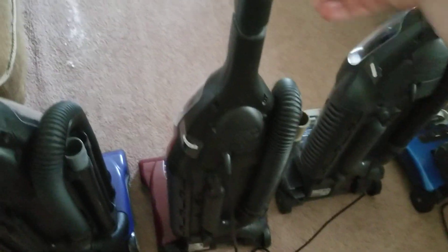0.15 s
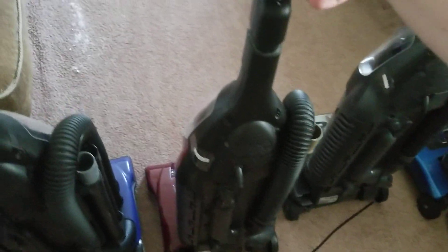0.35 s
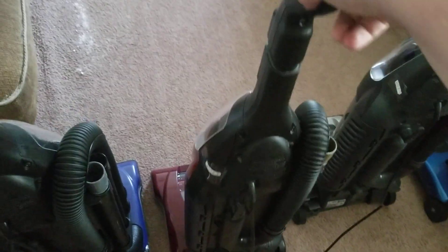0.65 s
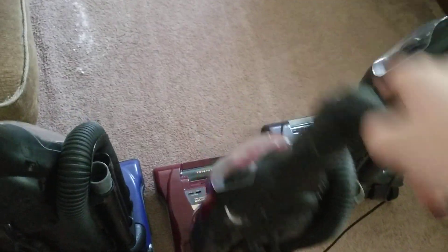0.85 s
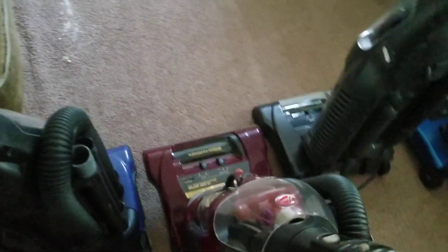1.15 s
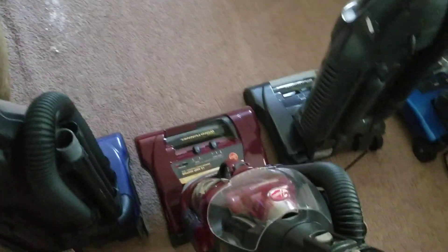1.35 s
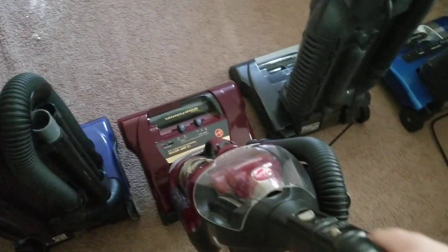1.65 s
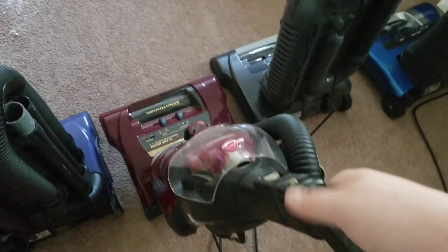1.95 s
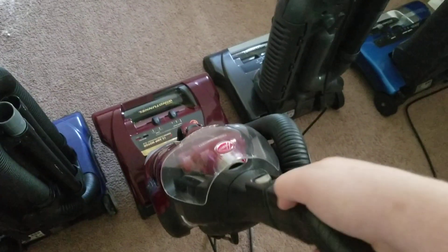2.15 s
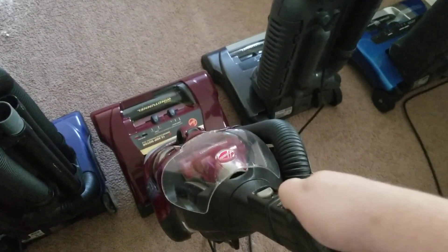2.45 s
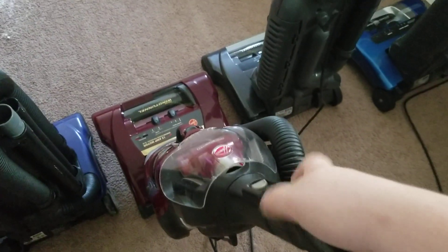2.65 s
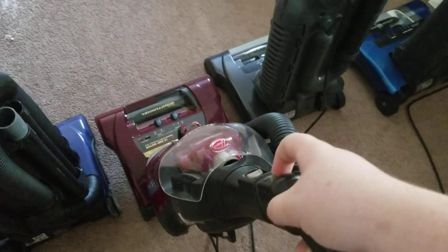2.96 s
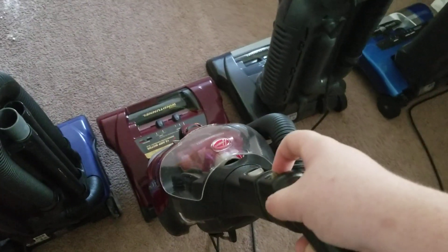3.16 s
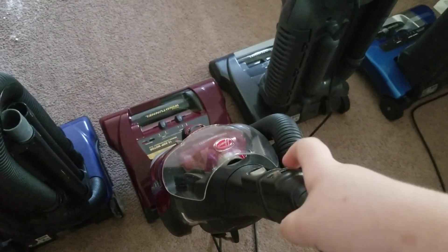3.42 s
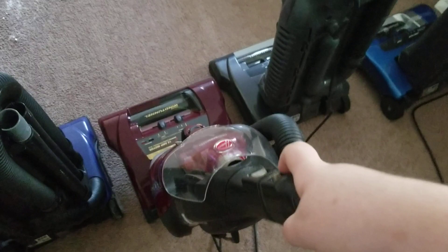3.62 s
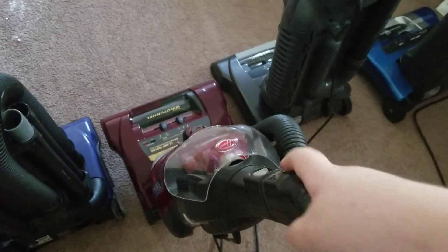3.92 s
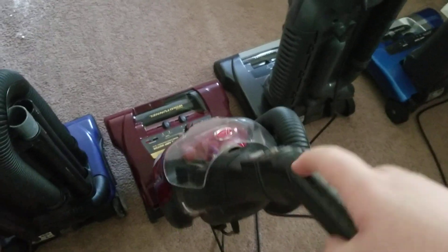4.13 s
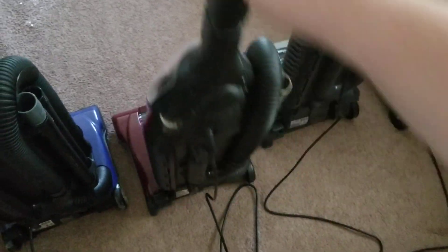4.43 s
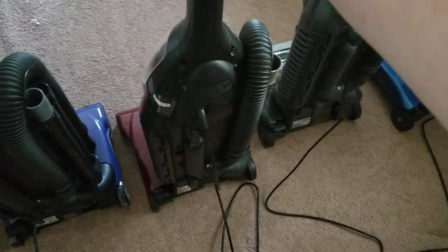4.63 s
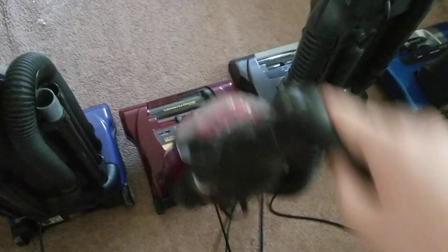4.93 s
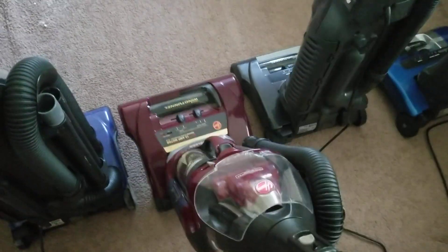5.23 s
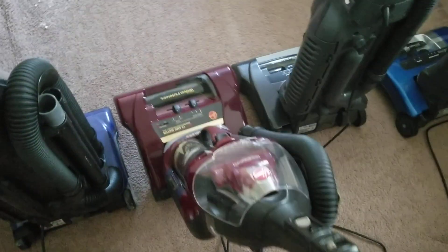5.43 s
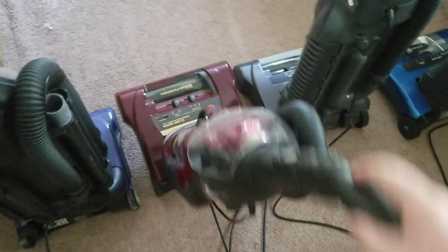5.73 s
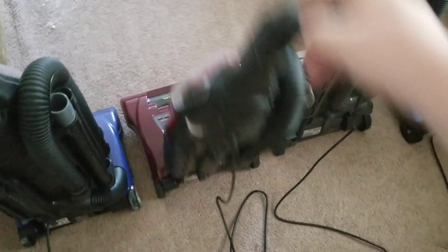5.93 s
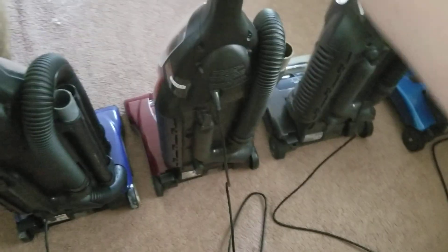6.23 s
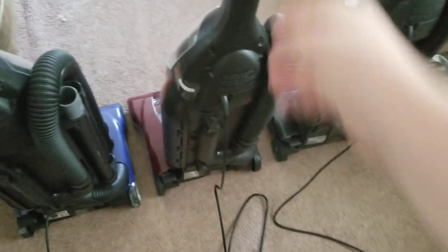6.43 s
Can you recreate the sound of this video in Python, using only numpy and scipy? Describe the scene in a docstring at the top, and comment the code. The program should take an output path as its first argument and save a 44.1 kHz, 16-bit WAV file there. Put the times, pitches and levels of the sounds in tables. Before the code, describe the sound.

Close stereo pickup of a vacuum cleaner being handled on carpet. A rushing motor noise fades smoothly to rest under plastic clacks, rattles and grainy rubbing. After a quieter moment, a springy switch clicks sharply with no motor response. Then come a busy burst of hollow knocks and scrapes, gliding thin squeaks from the pivot, a few tiny ticks, and a second squeaky swing. A faint low rumble and short room reflections remain throughout.

```python
"""Upright vacuum cleaners in a carpeted room, heard from close by, over a low room rumble.
First a motor coasts to rest, its hum and whine fading, while one cleaner is rolled forward and tilted back.
Its plastic shell knocks and scrapes: short noise bursts and pushed, grainy noise ring its resonances.
The pivot squeaks thinly (a gliding tone with its octave); then the switch snaps, but no motor starts.
The handle is then swung up and down twice, with more knocks, scrapes and squeaks, and a few thin ticks."""
import sys
import numpy as np
from scipy import signal
from scipy.fft import rfft, irfft
from scipy.io import wavfile
from scipy.ndimage import uniform_filter1d

SR = 44100
rng = np.random.default_rng(int(sys.argv[2]) if len(sys.argv) > 2 else 0)


def wav_out(sig):
    """Save sig, one row per channel (or a flat mono array), as 16-bit PCM at SR to the path in sys.argv[1]."""
    wavfile.write(sys.argv[1], SR, np.round(np.clip(np.atleast_2d(sig).T, -1, 1) * 32767).astype(np.int16))


N = 290177
TIME = np.arange(N) / SR  # s


def undb(db):
    """Turn decibels into a gain."""
    return 10 ** (np.asarray(db) / 20)


def unit(x):
    """Scale to an average (rms) level of 1."""
    return x / np.sqrt(np.mean(x ** 2))


def curve(rows, axis=1):
    """Read one column of a time table at every sample."""
    rows = np.array(rows)
    return np.interp(TIME, rows[:, 0], rows[:, axis])


def across(points, hz):
    """Read (frequency, value) points on a log-frequency axis."""
    f, value = np.transpose(points)
    return np.interp(np.log(hz + 1e-9), np.log(f), value)


def noise(colour, size=N):
    """Stereo noise of a given colour, alike in the bass and nearly unrelated in the treble."""
    # likeness of the two channels: (frequency [Hz], correlation [-1 to 1])
    likeness = [(60, 0.95), (350, 0.91), (700, 0.62), (1400, 0.28), (3000, 0.2), (5000, -0.055),
                (15000, 0.023)]
    hz = np.fft.rfftfreq(size, 1 / SR)
    if size < N:
        # short bursts: even strength at all frequencies, random phases
        mid, side = np.exp(2j * np.pi * rng.random((2, len(hz))))
    else:
        mid, side = rfft(rng.standard_normal((2, size)))
    like = np.clip(across(likeness, hz), -.99, .99)
    mid = mid * np.sqrt(1 + like)
    side = side * np.sqrt(1 - like)
    left_right = np.array([mid + side, mid - side])
    return unit(irfft(left_right * undb(across(colour, hz)), size))


def walk(rate):
    """A smooth random wander: levels held for 1 / rate seconds, then smoothed twice; spread near 1."""
    hold = int(SR / rate)
    steps = np.repeat(rng.standard_normal(N // hold + 1), hold)
    smooth = uniform_filter1d(uniform_filter1d(steps, hold), hold)
    return unit(smooth[:N])


def tone(hz, width_hz):
    """A narrow line whose strength and phase wander."""
    wander = walk(2 * width_hz) + 1j * walk(2 * width_hz)
    carrier = np.exp(2j * np.pi * np.cumsum(hz * np.ones(N)) / SR)
    return unit(np.real(wander * carrier))


def ring(x, modes):
    """The ringing that x excites in a set of resonances."""
    return sum(undb(db) * signal.lfilter(*signal.iirpeak(hz, hz / width, SR), x) for hz, width, db in modes)


def grains(rate, spread_db, length_s):
    """Envelope of tiny slips, about `rate` a second, of random size and quick to die; rms 1."""
    size_db = spread_db * np.minimum(rng.standard_normal(N), 2)
    slips = (rng.random(N) < rate / SR) * undb(size_db) ** 2
    power = signal.lfilter([1], [1, -np.exp(-2 / (length_s * SR))], slips)
    return unit(np.sqrt(power))


def blows(table, attack_s, crack_s, clack_s, thud_s, tilt_db, gain_db, size=4096):
    """Each contact is a burst of dense plastic modes; lows, middle and highs each die at their own rate.
    The colour slopes by tilt_db an octave and falls steeply above 1 / contact time."""
    # colour of a contact on plastic: (frequency [Hz], level [dB per Hz])
    contact_colour = [(100, -21.5), (230, -7.5), (330, 0), (600, -1), (1100, 2.5), (1500, -2.5),
                      (2700, 1.5), (3500, 1), (5000, 2.5), (6800, 1.5), (7500, -2), (8400, -8),
                      (9400, -5.5), (11500, -2.5), (15500, -6)]
    thud_hz, clack_hz = 850, 1880  # Hz: the thud lies below the first; the slope turns about the second
    light_db_per_octave = 13  # a light part, with less thud, also lacks lows up to a higher pitch
    out = np.zeros((2, N + size))
    t = np.arange(size) / SR
    hz = np.fft.rfftfreq(size, 1 / SR)[1:]
    splits = [signal.butter(2, f, fs=SR, output="sos") for f in (900, 3400)]  # Hz
    slope = across(contact_colour, hz) + tilt_db * np.log2(np.maximum(hz, thud_hz / 2) / clack_hz)
    for s, level_db, thud_db, contact_ms in table:
        lows_hz = thud_hz * 2 ** (max(-thud_db, 0) / light_db_per_octave)
        extra_thud = thud_db / (1 + (hz / lows_hz) ** 6)
        dullness = 10 * np.log10(1 + (hz * contact_ms / 1000) ** 4)
        colour = slope + extra_thud - dullness
        # undo the level scaling in noise(), so that a duller colour is also quieter
        burst = noise(np.c_[hz, colour], size=size) * np.sqrt(np.mean(undb(colour) ** 2))
        low, dull = (signal.sosfiltfilt(split, burst) for split in splits)
        thud = low * np.exp(-t / thud_s)
        clack = (dull - low) * np.exp(-t / clack_s)
        crack = (burst - dull) * np.exp(-t / crack_s)
        start = int(s * SR)
        onset = 1 - np.exp(-t / attack_s)
        out[:, start:start + size] += undb(level_db + gain_db) * (thud + clack + crack) * onset
    return out[:, :N]


def rumble():
    """Nearly steady low noise of the house, with faint hiss."""
    # (frequency [Hz], level [dB per Hz])
    rumble_colour = [(15, -37.5), (25, -16), (92, 1), (153, 4), (217, -8), (301, -8), (591, -23),
                     (1100, -27), (1400, -32.5), (1700, -33.5), (3430, -32.5), (6740, -31.5), (8140, -36.5),
                     (14800, -32.5), (16000, -38)]
    return noise(rumble_colour) * undb(-60 + .5 * walk(1.0))  # dB


def coasting_motor():
    """The slowing fan pushes less and less air through its ducts; a hum and a whine fade with it."""
    # colour of the air noise: (frequency [Hz], level [dB per Hz])
    coast_colour = [(88, -30), (150, -2.5), (254, -4.5), (309, 5), (545, -5.5), (854, -1.5), (1020, -4),
                    (1560, -8), (2060, -3), (2450, -13.5), (3040, -9), (3920, -15.5), (5150, -13),
                    (8070, -24), (16000, -29.5)]
    # resonances of the air ducts: (frequency [Hz], width [Hz], level [dB])
    ducts = [(291.3, 5.3, -5), (364, 15, -2), (816, 81, 1), (1290, 53, 0.5), (2120, 153.7, -30),
             (3100, 130, -41)]
    # faint wavering tones: (frequency [Hz], level against the air noise [dB], waver width [Hz])
    hum_tones = [(305, -11, 16), (843, -14, 36)]
    start_db, fade_db_per_s2 = -44.5, 9  # the fade in dB grows with the square of time
    # the whine lingers, taking only a share of that fade, and dies as the rotor stops
    whine_hz, whine_db, whine_fade_share, stop_s = 2046, -61.5, 0.26, 1.6
    fade_db = -fade_db_per_s2 * TIME ** 2
    air = noise(coast_colour) * undb(.8 * walk(30))
    hum = sum(undb(db) * tone(hz, width) for hz, db, width in hum_tones)
    whine_level = undb(whine_db + whine_fade_share * fade_db)
    stopping = np.sqrt(np.maximum(1 - TIME / stop_s, 0))
    whine = tone(whine_hz, width_hz=80) * whine_level * stopping
    return (unit(air + ring(air, ducts)) + hum) * undb(start_db + fade_db) + whine


def effort():
    """How hard the cleaner is pushed: each push builds up, holds and lets go."""
    # pushes that slide plastic over plastic and carpet: (start [s], length [s], level [dB])
    pushes = [(0, 0.45, -54), (0.6, 0.21, -51.5), (1.001, 0.13, -53.5), (1.273, 0.3, -58.5),
              (2.164, 0.024, -65), (2.33, 0.13, -65.5), (2.579, 0.15, -69.5), (3.312, 0.245, -79.5),
              (3.561, 0.14, -49.5), (4.198, 0.12, -67.5), (4.414, 0.13, -50), (4.599, 0.073, -58.5),
              (4.728, 0.13, -55), (4.93, .13, -56.5), (5.838, 0.38, -56), (6.359, 0.085, -64)]
    attack_s, release_s = 0.0074, 0.033
    push = np.zeros(N)
    for s, length, db in pushes:
        build_up = np.clip((TIME - s) / attack_s, 0, 1)
        let_go = np.exp(-np.maximum(TIME - s - length, 0) / release_s)
        push += undb(db) * build_up * let_go
    return push


def rattles(push, count=80):
    """Small light contacts at random moments, as strong as the push that shakes them loose."""
    scatter_db, thud_db, contact_ms = 0.5, -1, 0.34
    when, strength, softness = rng.random((count, 3)).T
    push_db = 20 * np.log10(push[(when * N).astype(int)] + 1e-9)
    level_db = push_db + scatter_db * (2 * strength - 1)
    return list(zip(when * N / SR, level_db, np.full(count, thud_db), contact_ms * (.5 + softness)))


def ringing_parts(table, size=10000):
    """Each struck part sounds a cluster of close modes that beat against each other."""
    out = np.zeros(N + size)
    t = np.arange(size) / SR
    for s, hz, db, decay_s in table:
        detune, phase = rng.uniform(-1, 1, size=(2, 5, 1))  # five modes
        cluster = np.sin(2 * np.pi * hz * (1 + .04 * detune) * t + np.pi * phase).sum(axis=0)
        envelope = (1 - np.exp(-t * hz)) * np.exp(-t / decay_s)
        start = int(s * SR)
        out[start:start + size] += undb(db - 4.5) * unit(cluster) * envelope
    return out[:N]


def shell():
    """Knocks, their rebounds, rattles and stick-slip scraping, all ringing the hollow body."""
    # knocks of the shell, duller with longer contact:
    # (time [s], level before gain_db [dB], extra thud [dB], contact time [ms])
    knock_table = [(0.345, -41.5, -13, 0.19), (0.409, -39.5, -7, .08), (0.478, -36, 0, 0.084),
                   (0.645, -44, -6, 0.043), (0.794, -46.5, 2, .07), (0.809, -52.5, 9.5, 0.38),
                   (0.867, -48, 1, 0.28), (0.890, -41.5, 0.5, 0.4), (1.267, -35, -11.5, 0.2),
                   (1.273, -35.5, -2.5, 0.11), (1.285, -44.5, 3.5, .02), (1.413, -36, -10, 0.19),
                   (1.422, -35, -1, 0.12), (1.428, -40, 4.5, 0.18), (1.744, -52, 0.5, 0.17),
                   (1.76, -41.5, -2.5, 0.15), (1.818, -60.5, 11.5, 0.23), (1.978, -40.5, 0.5, 0.18),
                   (2.156, -49.5, -1, 0.3), (2.211, -63.5, 11.5, 0.13), (2.334, -55.5, -4, 0.045),
                   (2.379, -58.5, 4, 0.23), (2.424, -34.5, -17, 0.16), (2.615, -64, 13, 0.13),
                   (3.25, -50, -18, 0.18), (3.295, -61, 0, .15), (3.454, -62, -1, 0.37),
                   (3.538, -35.5, -10.5, 0.36), (3.546, -38, 5.5, 0.14), (3.596, -44.5, 6, 0.23),
                   (3.627, -36.5, -6, 0.12), (3.694, -42.5, -1, 0.44), (3.727, -36, 1.5, 0.095),
                   (3.893, -43.5, -9.5, 0.23), (4.279, -71, 2, 0.092), (4.465, -47.5, -4, 0.26),
                   (4.519, -44.5, -12, 0.3), (4.607, -48, -0.5, 0.17), (4.723, -49, 1.5, 0.42),
                   (4.754, -38.5, -6.5, 0.37), (4.765, -47.5, -9, 0.048), (4.921, -46, 0, 0.35),
                   (4.968, -49, -29, 0.62), (5.009, -45.5, -8, 0.41), (5.04, -45.5, -5.5, 0.4),
                   (5.565, -57.5, 8, 0.29), (5.844, -51, -1, 0.17), (5.971, -40, -4.5, 0.41),
                   (6.052, -44, 3.5, 0.6), (6.128, -46, 1, 0.033), (6.196, -52, -2, 0.12),
                   (6.37, -62, 10, .2)]
    # a light first touch, the blow, and one rebound of the loose parts: (delay [s], level against the blow [dB])
    bounces = [(-.003, -18.5), (0, 0), (.011, -7)]
    # colour of the scraping: (frequency [Hz], level [dB per Hz])
    scrape_colour = [(120, -31.5), (200, 2), (236, -7.5), (334, 4.5), (500, 0), (1350, -10), (2290, -19.5),
                     (3490, -15), (4200, -19), (7270, -16), (8580, -32), (11900, -21), (16000, -40)]
    # resonances of the hollow shell: (frequency [Hz], width [Hz], level [dB])
    shell_modes = [(311.3, 38, -1), (391.5, 47, -3.5), (486, 44, 6), (651, 30, 4.5), (920, 40, 5.5),
                   (1130, 40, -8.5), (1940, 140, 5.5), (2423, 46, 6), (2740, 17, -28.5), (3826, 12, 4.5),
                   (4890, 230, -3.5), (5540, 230, -15.5), (6230, 71, -39)]
    # modes of the heavy body, rung by every knock: (frequency [Hz], level against the thud [dB], decay [s])
    body_modes = [(198.7, -15.5, .022), (376, -6, .017), (1070, -11.5, 0.0076)]
    # loose parts that ring out on their own: (time [s], pitch [Hz], level before a fixed trim [dB], decay [s])
    loose_parts = [(0.411, 1323, -37.5, 0.008), (2.424, 3690, -29.5, 0.0029), (3.546, 2850, -24.5, 0.004),
                   (3.88, 206.6, -51, 0.067), (3.893, 2557, -36, 0.0055), (3.891, 2740, -45, .008)]

    push = effort()
    contacts = [(s + delay_s, db + bounce_db, thud, contact)
                for s, db, thud, contact in knock_table for delay_s, bounce_db in bounces]
    knocks = blows(contacts + rattles(push), attack_s=0.0011, crack_s=0.0049, clack_s=0.0094,
                   thud_s=0.0096, tilt_db=-2.0, gain_db=12)
    slips = grains(rate=240, spread_db=0.5, length_s=0.0093)
    scrape = noise(scrape_colour) * slips * push * undb(-2)
    body = [(s, hz, db + thud + mode_db, decay_s)
            for s, db, thud, _ in knock_table for hz, mode_db, decay_s in body_modes]
    direct = knocks + scrape
    return direct + undb(-10) * ring(direct, shell_modes) + ringing_parts(body + loose_parts)


def pivot():
    """A thin wavering squeak, higher and louder the faster the handle swings, with a weaker octave."""
    # pitch follows the speed of the handle, one curve a swing: (time [s], pitch [Hz])
    squeaks = [
        [(2.08, 3050), (2.17, 3250), (2.23, 3120), (2.3, 3300), (2.4, 3150), (2.58, 3080)],
        [(4.07, 3050), (4.105, 3310), (4.26, 3810), (4.37, 3890), (4.465, 4320), (4.52, 4100), (4.62, 4250),
         (4.695, 3550), (4.75, 3650), (4.82, 3430), (4.87, 3580), (4.91, 3250)],
        [(5.8, 3000), (5.85, 3780), (5.92, 4420), (6.02, 4470), (6.14, 4190), (6.2, 3720), (6.31, 3600),
         (6.4, 3450), (6.46, 3130)],
    ]
    # level of each swing against squeak_db: (level [dB])
    swing_levels = [2, -1.5, -3.5]
    # level of the octave by its pitch, strongest near 7.5 kHz and falling above 8 kHz: (frequency [Hz], level
    # against the fundamental [dB])
    octave_levels = [(6400, -44.5), (7300, -8), (7850, -5.5), (8200, -12)]
    squeak_db, flutter_db = -66.5, 2.5  # the grip comes and goes
    rest_hz, swell_hz = 2930, 850  # silent at the first; swells over about the second above it
    judder = .02  # share of the pitch, as the handle slows
    out = np.zeros(N)
    for rows, swing_db in zip(squeaks, swing_levels):
        hz = curve(rows)
        slowing = uniform_filter1d(1. * (np.gradient(hz) < 0), size=2000)
        waver = 1 + .009 * walk(500) + judder * slowing * walk(28)
        phase = 2 * np.pi * np.cumsum(hz * waver) / SR
        moving = uniform_filter1d(1. * ((TIME > rows[0][0]) & (TIME < rows[-1][0])), size=600)
        swell = np.tanh(np.maximum(hz - rest_hz, 0) / swell_hz)
        strength = swell * undb(swing_db) * undb(squeak_db + flutter_db * walk(45))
        octave = undb(across(octave_levels, 2 * hz) + 2.5 * walk(24))
        out += moving * strength * (np.sin(phase) + octave * np.sin(2 * phase))
    return out


def switch():
    """The spring catches, snaps over, bounces and rings on."""
    # (time [s], level before gain_db [dB], extra thud [dB], contact time [ms])
    snap_table = [(2.851, -42, -22.5, 0.17), (2.855, -29.5, -16.5, 0.16), (2.8615, -37.5, -13, 0.28),
                  (2.8738, -27.5, -7.5, 0.098)]
    # ringing of the switch spring and its housing: (frequency [Hz], width [Hz], level [dB])
    spring = [(1940, 35, -1), (2690, 14, 0), (2810, 16, -1), (3385, 45, -2), (3840, 45, -2), (4932, 25, 1),
              (5140, 25, 0), (5700, 60, -1), (6625, 40, 0)]
    snaps = blows(snap_table, attack_s=0.00025, crack_s=0.004, clack_s=.005,
                  thud_s=0.0047, tilt_db=1, gain_db=14.5)
    return snaps + undb(1.5) * ring(snaps, spring)


def thin_ticks():
    """Thin ticks close by: short contacts whose highs die within a few milliseconds."""
    # (time [s], level before gain_db [dB], extra thud [dB], contact time [ms])
    tick_table = [(4.545, -43.5, -7, 0.093), (5.121, -60.5, 8, .04), (5.164, -58.5, 15, 0.028),
                  (5.369, -51, -8.5, .02), (6.002, -42.5, 15, .02)]
    return blows(tick_table, attack_s=0.00042, crack_s=0.0018, clack_s=0.0019,
                 thud_s=0.007, tilt_db=3.5, gain_db=8.5)


def room(x, gap_s, size=24000):
    """Diffuse reflections of a small furnished room, each band with its own decay."""
    # reverberation: (frequency [Hz], time to fall by 60 dB [s])
    decay_times = [(150, 0.37), (500, 0.29), (1200, 0.25), (2800, 0.27), (5500, 0.29), (9000, 0.18),
                   (15000, 0.27)]
    t, hz = np.arange(size) / SR, np.fft.rfftfreq(size, 1 / SR)
    spectrum = rfft(noise([(20, 0), (20000, 0)], size=size))
    centres = np.array(decay_times)[:, 0]
    tail = 0
    for (_, t60), share in zip(decay_times, np.eye(len(decay_times))):
        band = irfft(spectrum * across(np.c_[centres, share], hz), size)
        tail = tail + band * np.exp(-np.log(1000) * t / t60)
    build_up = 1 - np.exp(-(t / gap_s) ** 2)
    tail = unit(tail * build_up) / np.sqrt(size)
    return signal.fftconvolve(x, tail, axes=1)[:, :N]


def scene():
    """The cleaners and the room that answers them."""
    body, squeak, snap, ticks = shell(), pivot(), switch(), thin_ticks()
    into_room = undb(-6) * body + undb(-5.5) * snap + undb(-2.0) * ticks + undb(-3.0) * squeak
    reflections = room(into_room, gap_s=0.0045)
    return rumble() + coasting_motor() + body + squeak + snap + ticks + reflections


def record(dry):
    """A steep low-pass filter cuts the top above 16 kHz."""
    return signal.sosfiltfilt(signal.ellip(8, .1, 60, 16000, fs=SR, output="sos"), dry)


dry = scene()
out = record(dry)
wav_out(out)
```